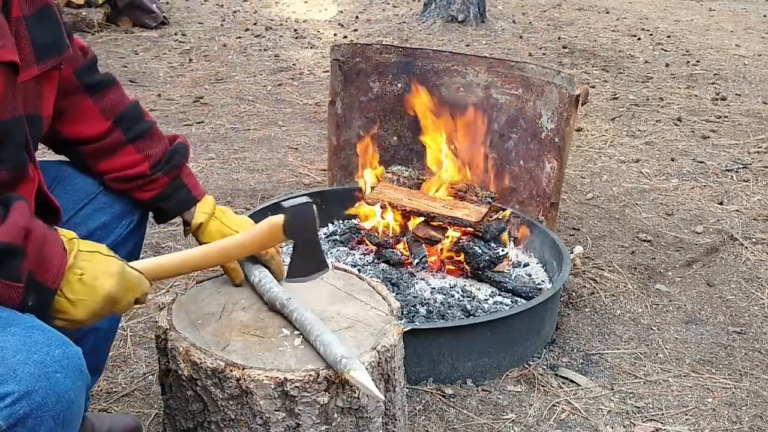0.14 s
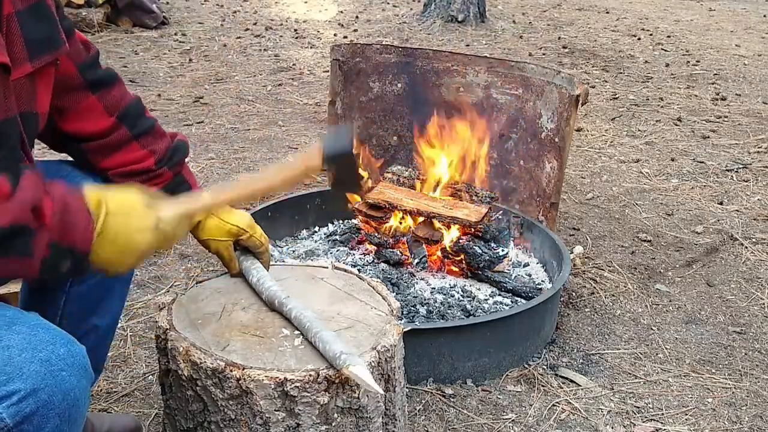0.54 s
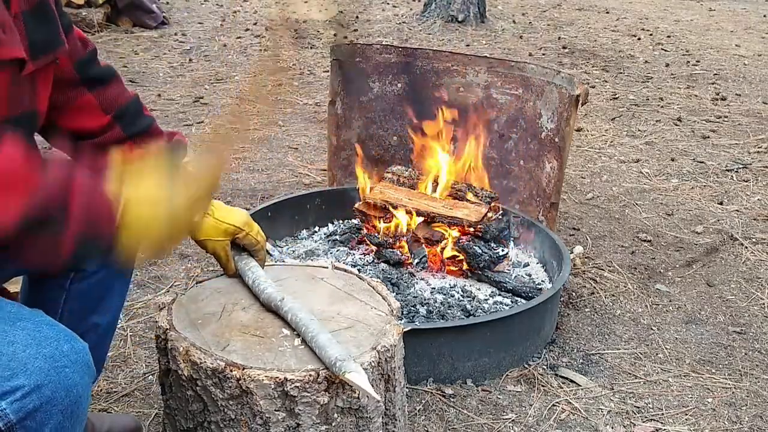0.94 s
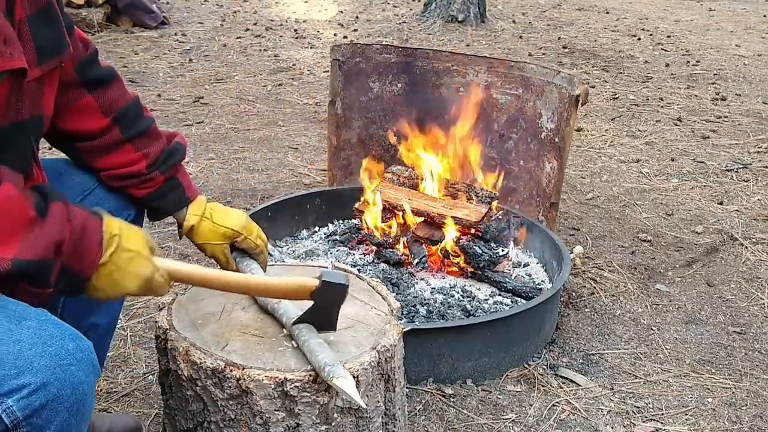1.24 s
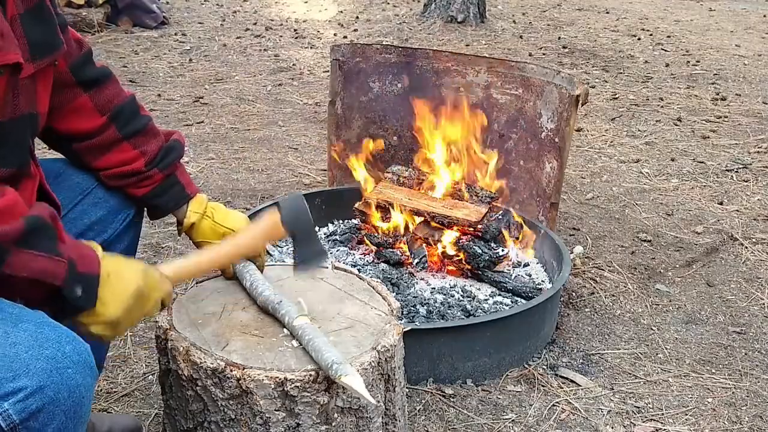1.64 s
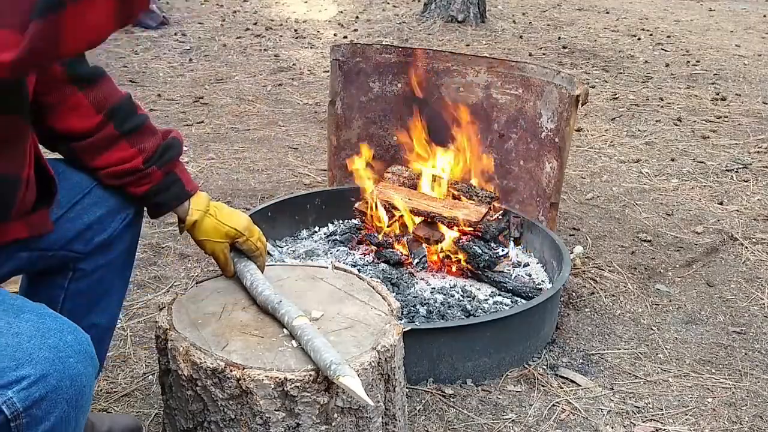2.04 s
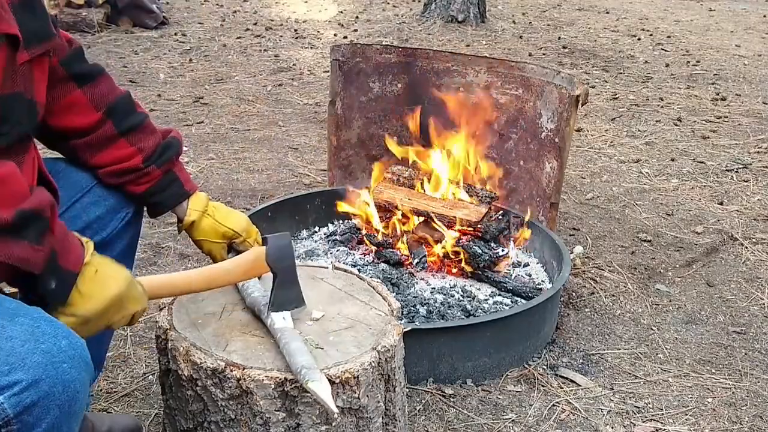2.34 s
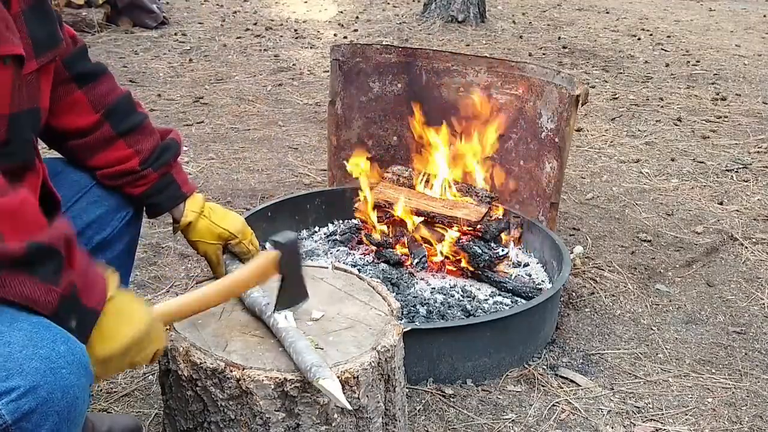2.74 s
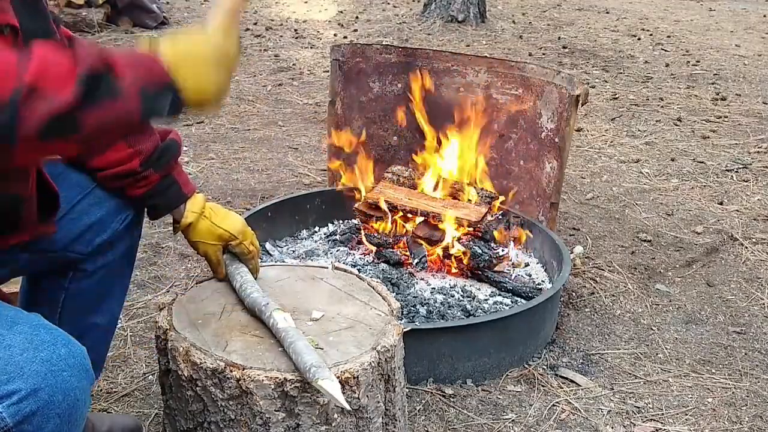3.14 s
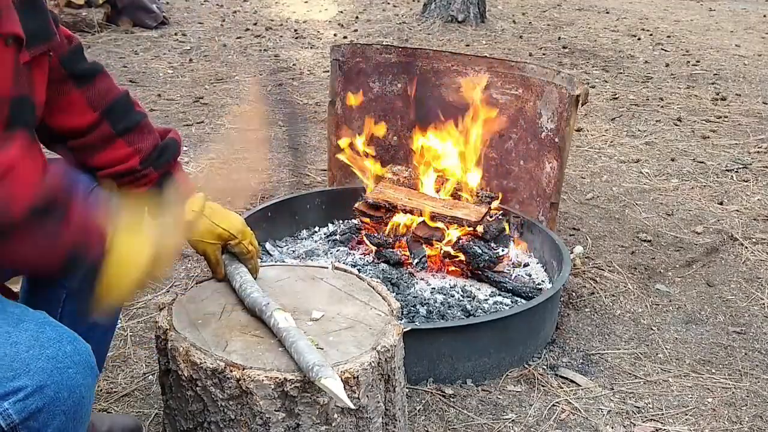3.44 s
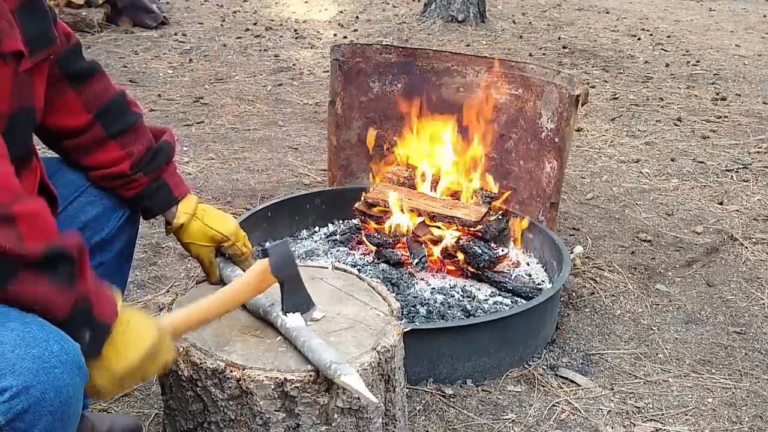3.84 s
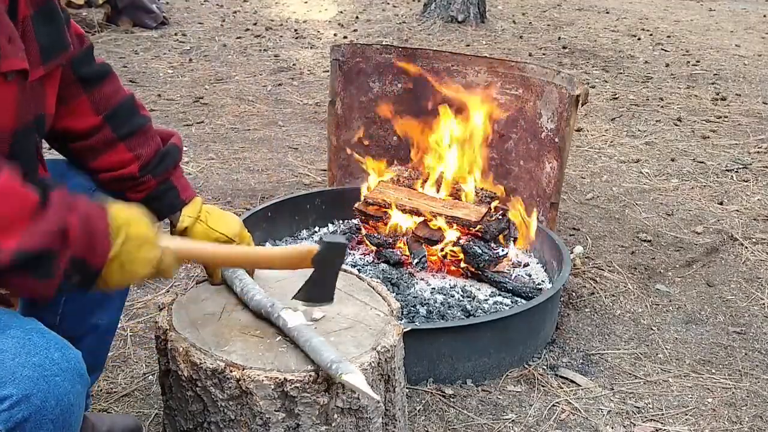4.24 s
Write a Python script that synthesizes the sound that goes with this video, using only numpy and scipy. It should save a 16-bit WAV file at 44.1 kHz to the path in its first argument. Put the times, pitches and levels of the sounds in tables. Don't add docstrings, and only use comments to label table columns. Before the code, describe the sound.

A small campfire burns in a metal ring in a pine clearing, heard close in stereo: a very quiet, low airy roar with thin sizzle, fine bright ticks and small dry pops leaning right. A stronger, sharp pop snaps at about 0.95 s. At 1.1 s a hatchet bites a green stick on a stump: a loud, bright, extremely short woody crack, with a faint dull thud through the ground and a quick diffuse echo off the trunks, swelling around 0.2 s later and soon gone. Light chips tick down until 1.4 s. A softer, duller-bodied chop lands at 2.35 s, again with chips and echo. Crackling thickens from 2.8 s, with several crisp pops between 3.0 and 3.4 s. The third chop, hard and dry, comes at 3.6 s, chips scattering until 3.8 s. Sizzle rises afterward, and a bright pop with a brief steam hiss comes at 4.3 s.

```python
import sys
import numpy as np
from scipy import signal
from scipy.fft import rfft, irfft
from scipy.io import wavfile
from scipy.ndimage import uniform_filter1d

SR = 44100
rng = np.random.default_rng(int(sys.argv[2]) if len(sys.argv) > 2 else 0)


def amplitude_ratio(level_db):
    exponent = np.asarray(level_db, float) / 20
    return 10 ** exponent


def pcm_store(signal):
    levels = np.round(np.clip(np.atleast_2d(signal), -1, 1) * 32767)
    wavfile.write(sys.argv[1], SR, levels.astype(np.int16).T)


N = 193818

# (time [s], crack [dB], echo [dB], tree line [dB], stump shudder [dB])
BLOWS = [
    (1.1063, -6.5, -28, 5, -39),
    (2.3429, -15.5, -30, 4, -36),
    (3.5901, -8.5, -31, 7.5, -35.5),
]
# (first snap [share], rise [share of bite], bark crush [dB], crush spread [ms])
ENTRIES = [
    (0.079, 0.49, -33, 1.6),
    (.25, 0.44, -34, 1.7),
    (0.12, 0.38, -23.5, 2.6),
]
# (frequency [Hz], density [dB per Hz])
CRACK_COLOURS = [
    [(2240, -32), (3800, -5), (4890, -13.5), (5500, -1), (6810, -10.5), (8360, 1.5), (10900, -15.5),
     (16000, -28)],
    [(2240, -39.5), (3800, -18), (4550, -1.5), (5970, -11), (8610, 0), (10400, -13), (12000, -9.5),
     (16000, -34.5)],
    [(2240, -36), (3800, -10), (4440, -19), (5650, -1), (7020, 0.5), (10400, -10), (12700, -12.5),
     (16000, -29)],
]
# (frequency [Hz], level [dB], t60 [s], delay after touch [ms])
STICK_MODES = [
    [(400, -8.5, .013, 4.0), (700, -10, .016, 2.8), (957.51, -10, 0.015, 1.8), (1225.3, -15, .012, 1.35),
     (1580, -17, 0.015, 1.1), (1760.8, -6.5, .011, .8), (2052, -13, 0.0088, 0.94),
     (2340, -9.5, 0.011, 1.26), (2620, -12.5, 0.014, 1.46), (2882.7, -12, .006, 1.82),
     (3300, -7.5, .007, 1.9), (3600, -4.5, 0.0047, 2), (2594.3, -15.5, .0098, 11), (3570, -20, 0.0089, 11)],
    [(228, -20.5, 0.03, 3.068), (440, -20.5, .01, 6.106), (601.34, -20, .012, 2.5),
     (733.11, -16, .022, 2.3944), (936.17, -12.5, .015, 1.4), (1200, -11, 0.016, 1.993),
     (1420, -12.5, .011, 1.1972), (1640, -9.5, 0.017, 1.45), (1832.9, -15.5, 0.016, 1.17),
     (2091.2, -6.5, .012, 1.42), (2551.8, -9, .01, 1.42), (3100, -11.5, 0.014, 1.5833),
     (3400, -9, .0084, 1.45), (2900, -23, .008, 13)],
    [(379.6, -31, 0.038, 4.5), (772, -23, 0.04421, 2), (1097, -11, 0.012, 1.49),
     (1633.7, -3, 0.0053, 2.3686), (1866.8, -11.5, 0.009418, 1.5), (2053.9, -10.5, 0.0069, 2.5),
     (2450, -22.5, .009, 1.486), (2822.4, -11, .009, 1.64), (3386, -18, 0.016, -0.0254),
     (1500, -13.5, 0.0051, 6), (1000, -22, 0.01, 0.7512), (3500, -24.5, .01, 11)],
]
# (frequency [Hz], density [dB per Hz])
SHUDDER_COLOUR = [(21, -28.5), (35, -4.5), (73, -0.5), (124, -6.5), (194, 0), (262, -16), (500, -20.5),
                  (650, -29.5), (1100, -120)]
# (time [s], peak [dB],
# frequency [Hz])
KNOCKS = [(1.128, -26.5, 1500), (1.1425, -28, 700), (2.2944, -34.5, 1000), (2.365, -29, 1300),
          (2.516, -48.5, 301), (3.578, -30, 550), (3.585, -42.5, 400), (3.5858, -40.5, 1500),
          (3.5879, -40, 2393), (2.3421, -34.5, 1400), (2.3429, -11.5, 1700), (1.1064, -22, 1500),
          (3.611, -34, 1100), (3.7096, -43, 200)]
# (time [s], peak [dB], ring [Hz], left over right [dB])
CHIPS = [(1.1222, -32.5, 8500, -2), (1.2337, -30.5, 5000, -8.5), (1.2645, -43.5, 9800, -9.5),
         (1.303, -51.5, 5670, -2), (1.325, -43, 9900, -9.5), (1.3624, -46.5, 9576, -5.5),
         (1.3793, -44, 6038, -12), (2.4701, -43, 8500, -9), (2.5161, -43.5, 9574, -11.5),
         (2.606, -48, 9100, -6), (2.5297, -60, 8500, -7), (2.616, -50, 10300, -8.5),
         (2.6536, -58, 8550, -13.5), (3.607, -23, 7909, 4), (3.717, -31.5, 6135, -12),
         (3.7496, -49, 7805, -2), (3.7799, -41.5, 9031, -9), (3.8048, -44, 9250, -16.5)]
# (frequency [Hz], level [dB])
NEAR_LEFT = [(200, 1.5), (800, 1.5), (2400, -5), (4500, -4), (6500, -4.5), (8500, -11), (11000, -7),
             (15000, -2)]
# (frequency [Hz], lead [rad])
LEFT_LEAD = [(100, 0.), (2000, .1), (3300, .7), (4300, 2.), (7000, 2.3), (9000, 3.3), (11500, 4.6),
             (14000, 6.3), (16500, 8.)]

# (frequency [Hz], density [dB per Hz])
ECHO_COLOURS = [
    [(150, -37.5), (250, -11.5), (698, -3), (1120, -14.5), (1700, -4), (2670, -12), (8400, -22),
     (16000, -35)],
    [(150, -36.5), (250, -4), (775, -0.5), (1100, -1.5), (1260, -6.5), (1400, -3), (3840, -11.5),
     (16000, -31.5)],
    [(150, -22), (250, -1.5), (607, -11.5), (938, -2.5), (2760, -12.5), (4570, -19.5), (6470, -18),
     (16000, -35.5)],
]
# (frequency [Hz], width [Hz], level [dB])
ECHO_BANDS = [
    [(2320.5, 270, 1.5), (2900, 250, -2.5), (3667.6, 300, 4), (4469, 190, -3.5), (5640, 400, 4),
     (6987, 1200, -5.5), (8500, 400, 3)],
    [(1100, 400, -2.5), (5198.6, 250, -4), (6297, 630, -5), (8800, 400, -1.5), (12644, 1600, 2.5)],
    [(1200, 300, -3.5), (4087, 470, -4.5), (5381.5, 760, -1.5), (7000, 600, 0.5), (9100, 560, 4.5)],
]
# (frequency [Hz], t60 [s])
WOOD_T60 = [(100, 0.18), (400, 0.26344), (1000, 0.25647), (2500, 0.28091), (6000, 0.26216), (9000, 0.3),
            (12000, 0.17), (16000, .24)]
# (frequency [Hz], level [dB])
FIRE_ECHO_COLOUR = [(800, -28), (2000, -8.5), (4000, -7), (8000, -8), (11000, -10.5), (15000, -19)]

# (time [s], peak [dB], ring [Hz], low part [dB], left over right [dB])
POPS = [(.2853, -42, 8800, -10, -13), (.3127, -40.5, 9364, -34.5, -8.5), (.3646, -47, 9365, -7.5, -10),
        (.4055, -48.5, 5430, -9, -9.5), (.4833, -41.5, 8279, -36, -9), (.7387, -50, 4512, -8.5, -9),
        (.9451, -23.5, 7128, -13.5, -19), (.9462, -37, 7449, -12.5, -1.5), (1.0632, -51, 9000, -1, -10),
        (1.7041, -47, 9547, -12.5, -17), (1.7221, -43.5, 5102, -25.5, -13),
        (1.9595, -46.5, 8854, -10.5, -13.5), (2.0384, -49.5, 8530, -6.5, -9), (2.0598, -34, 9131, -15, -4),
        (2.3152, -44, 8660, -13, -9.5), (2.7865, -43.5, 8471, -35.5, -8.5),
        (3.0335, -39.5, 8700, -23.5, -9.5), (3.0559, -36.5, 4400, -16.5, -14.5),
        (3.1722, -33.5, 9450, -38.5, -12.5), (3.3168, -33.5, 8552, -11.5, -7.5),
        (3.4011, -34, 9400, -32.5, -6.5), (4.0061, -47.5, 7809, -26.5, -9.5),
        (4.2855, -38.5, 9450, -15, -7.5), (4.2898, -21, 8547, -12, -16)]
# (time [s], peak [dB])
TICKS = [(.0533, -53.5), (0.202, -49), (.4254, -46.5), (.4604, -49.5), (0.5365, -54), (0.656, -54),
         (0.6945, -48.5), (0.7666, -55), (.832, -56), (.876, -58), (1.496, -53.5), (1.6877, -51),
         (1.8012, -52.5), (1.8495, -50), (2.1828, -48.5), (2.2165, -53), (2.2938, -51), (2.8544, -55),
         (2.9133, -54), (3.0505, -49), (3.2674, -53.5), (3.4176, -41), (3.4889, -51), (3.9218, -56),
         (3.9584, -54), (3.9986, -47), (4.0695, -49), (4.1356, -58), (4.1568, -59.5), (4.1995, -51),
         (4.3259, -51)]
FAINT_TICKS = [.52, .589, .702, .748, .906, .914, 1.022, 1.045, 2.228, 2.38, 2.42, 2.5936, 2.666, 2.693,
               2.705, 2.74, 3.161, 3.36, 4.086, 4.177, 4.234, 4.369, 4.385]
# (time [s], level [dB], frequency [Hz], t60 [ms])
RINGS_AND_TICKS = [(0.2744, -49, 11000, 1.227), (.2867, -52, 8500, 2.97), (0.3156, -48.5, 8500, 5.195),
                   (0.945, -25.5, 7331, 2.629), (0.947, -21.5, 8112, 4.154), (1.317, -57.5, 9000, 2.5),
                   (2.3173, -47.5, 9104, 8.), (3.0572, -34.5, 10310, 2.7), (3.318, -38, 8500, 8.5),
                   (3.3197, -39.5, 5750, 6.065), (4.2908, -30, 7434, 3.062), (2.4205, -41.5, 10500, 1.049),
                   (2.4455, -51, 9500, 1.194), (2.531, -53.5, 8500, 1.19), (2.562, -57.5, 8000, 1.0263),
                   (2.571, -59, 9500, 1.), (2.5815, -59.5, 9500, 0.9807), (2.596, -56.5, 9500, 1.009),
                   (2.459, -54, 10500, 1.001), (2.408, -45.5, 10000, 1.01), (1.3055, -55.5, 8500, 1.)]
# (centre [s], spread [ms], level [dB], frequency [Hz], width [Hz])
JETS = [(0.963, 3.0, -51.5, 7770, 5110), (1.461, 11.54, -72.5, 3400, 494),
        (1.535, 14.347, -72.5, 3300, 601.6), (1.62, 111, -66, 7490, 6506), (2.455, 9.38, -60.5, 3500, 404),
        (3.7, 8.302, -55, 3300, 700), (4.208, 9.0, -65.5, 3120, 800), (4.24, 32.77, -72, 3546, 350),
        (4.3, 3.9, -40.5, 8300, 1770), (4.304, 5.6, -52, 3100, 887.6), (1.064, 1.4, -52, 6000, 14000),
        (1.061, .9, -59, 11000, 8000), (1.0682, 1.2, -62, 9000, 4995), (2.294, 1.2, -63, 10000, 7000)]
# (centre [s], level over calm [dB], spread [s])
FLARES = [
    (0., 12, 0.0417),
    (.72, -7.5, 0.162),
    (1.02, 3, .1),
    (1.42, -1.5, 0.31),
    (2.88, 5.5, 0.22),
    (3.701, 10, 0.3558),
    (4.2, 8, 0.1183),
]
# (delay [ms], spread [ms], level [dB])
RING_WALLS = [
    (1.6, .45, -22),
    (4, 2, -42),
    (12, 5, -43),
]
# (frequency [Hz], level [dB])
POP_COLOUR = [(1000, -43), (2500, -12), (4500, -10), (6500, -5), (8500, 4.5), (11000, -1.5), (14000, -8.5),
              (16500, -21)]

# (frequency [Hz], density [dB per Hz])
ROAR_COLOUR = [(15, -43.5), (25, -17.5), (74, -0.5), (159, 0), (280, -9.5), (726, -6.5), (1180, -12.5),
               (1280, -13), (1600, -16.5), (4240, -27), (6920, -27), (8830, -25), (12600, -36),
               (15200, -33.5), (16500, -46.5)]
# (frequency [Hz], correlation [1])
DIFFUSE_SAME = [(60, 0.79), (180, 0.91), (550, 0.46), (1650, -0.23), (4970, -0.11), (15000, 0.023)]
# (frequency [Hz], left over right [dB])
DIFFUSE_LEFT = [(60, 0), (180, -1.0), (550, -1), (1650, -2), (4970, -1.5), (15000, -7.5)]
# (frequency [Hz], level [dB])
MIC = [(20, -30), (34, -12), (48, 0), (15700, 0), (16100, -8), (16700, -22), (16900, -90)]

BITE_MS, CRACK_SAME = 2.6009, 0.58
SHUDDER_RISE_S, SHUDDER_T60_S = 0.041, 0.36
GROUND_S, GROUND_SPREAD_S, GROUND_DB = 0.0041, 0.0044, 3.5
NEAR_TRUNKS_DB = -3
TREE_LINE_S, TREE_LINE_RISE_S, TREE_LINE_FALL_S = 0.18493, 0.049, 0.18
ECHO_RISE_CYCLES, ECHO_APART = 7.3, 0.82
STREAK_DB, CLUMP_DB, CLUMP_DB_PER_KHZ = 0.1769, 1.6966, 0.0785
TICK_HZ, TICK_SPREAD_HZ, TICK_LOW_DB, TICK_LEFT_DB, TICK_WANDER_DB = 8800, 890, -19, -10.5, 3
FAINT_DB, CHIP_LOW_DB, PUFF_DB = -57.5, -18, -17
EMBER_BED_MS, EMBER_BED_SHARE = .45, .4
SIZZLE_DB, ROAR_DB, ROAR_FOLLOWS = -67, -64, 0.2


def chop(crack_db, bite_ms, entry, colour, modes):
    first, rise, crush_db, crush_ms = entry
    ms = np.arange(4096) * 1000 / SR - 4
    u = np.maximum(ms, 0) / bite_ms
    snaps = rng.standard_normal(len(ms)) * amplitude_ratio(3.5 * np.minimum(rng.exponential(1, len(ms)), 4))
    unrelated = snaps[::-1]
    snaps = np.array([CRACK_SAME * snaps + np.sqrt(1 - CRACK_SAME ** 2) * unrelated, snaps])
    onset = np.minimum(first * (u > 0) + u / rise, 1)
    burst = onset * (np.exp(-u ** 3.0) + 0.068 * np.exp(-ms / 5.6))
    crush = amplitude_ratio(crush_db) * np.exp(-((ms + 0.4) / crush_ms) ** 2)
    out = amplitude_ratio(crack_db) * evened(coloured(snaps, colour)) * (burst + crush)
    for hz, db, t60, delay_ms in modes:
        add(out, (4 + delay_ms) / 1000, amplitude_ratio(db) * ring(hz, t60, .4 / hz, count=3000))
    return out


def shudder(db, rise_s, t60):
    t = np.arange(SR // 2) / SR
    a, b = (evened(coloured(rng.standard_normal(len(t)), SHUDDER_COLOUR)) for _ in range(2))
    envelope = amplitude_ratio(db - 60 * t / t60) * np.minimum(t / rise_s, 1) ** 0.49
    return envelope * np.array([0.73 * a - 0.3 * b, a + 0.21 * b])


def knock(db, hz):
    return amplitude_ratio(db) * ring(hz, 0.0065, 1.1 / hz, count=1500)


def trunks(line_db):
    t = np.arange(0, .5, .001)
    ground = amplitude_ratio(GROUND_DB) * np.exp(-((t - GROUND_S) / GROUND_SPREAD_S) ** 2)
    late = (t - TREE_LINE_S) / np.where(t < TREE_LINE_S, TREE_LINE_RISE_S, TREE_LINE_FALL_S)
    near = amplitude_ratio(NEAR_TRUNKS_DB) * np.exp(-np.maximum(late, 0) ** 2)
    line = amplitude_ratio(line_db) * np.exp(-late ** 2)
    gain = np.minimum(t / GROUND_S, 1) ** 2 * (ground + near + line)
    return np.transpose([t, 20 * np.log10(gain + 1e-3)])


def woods(colour, strength, bands=()):
    taps = rng.standard_normal((2, SR // 2)) * amplitude_ratio(3.2 * np.minimum(rng.exponential(1, SR // 2), 4))
    hz, t, z = signal.stft(taps, SR, nperseg=256)
    build_up = 1 - np.exp(-(np.outer(hz, t) / ECHO_RISE_CYCLES) ** 2)
    decay_db = read(colour, hz)[:, None] - 60 * t / read(WOOD_T60, hz)[:, None]
    z = pair(*z, hz, ECHO_APART) * build_up * amplitude_ratio(decay_db)
    chance = rng.standard_normal(z.shape[1:])
    streaks = uniform_filter1d(uniform_filter1d(chance[::-1], 2, 0), 18, 1)
    clumps = uniform_filter1d(uniform_filter1d(chance, 5, 0), 3, 1)
    relief = 0 * hz
    for band_hz, width_hz, db in bands:
        relief = relief + db * np.exp(-((hz - band_hz) / width_hz) ** 2)
    lumpy = CLUMP_DB + CLUMP_DB_PER_KHZ * hz / 1000
    texture_db = relief[:, None] + lumpy[:, None] * evened(clumps) + STREAK_DB * evened(streaks)
    tail = signal.istft(z * amplitude_ratio(texture_db), SR, nperseg=256)[1]
    tail = tail / np.sqrt(np.mean(tail[:, 400:1600] ** 2))
    return tail * amplitude_ratio(np.interp(np.arange(tail.shape[1]) / SR, *np.transpose(strength)))


def fire():
    right, left, sent = np.zeros((3, N))
    rows = crackle()
    for (s, db, hz, low_db, pan_db), noise in zip(rows, rng.standard_normal((len(rows), 1400))):
        sound = amplitude_ratio(db + 5.0) * pop(hz, low_db, PUFF_DB, noise)
        add(right, s - .0008, sound)
        add(left, s - .0008, sound * amplitude_ratio(np.clip(pan_db + 7.5, -8, 8)))
        add(sent, s, amplitude_ratio([db]))
    for s, db, hz, t60_ms in RINGS_AND_TICKS:
        sound = amplitude_ratio(db + 5) * ring(hz, t60_ms / 1000, 0.00006, count=500)
        add(right, s, sound)
        add(left, s, sound * amplitude_ratio(-1.5))
    for s, spread_ms, db, hz, width_hz in JETS:
        sound = jet(spread_ms, db, hz, width_hz)
        start = s - .003 * spread_ms
        add(right, start, sound)
        add(left, start, sound * 1.3)
    swell_db = SIZZLE_DB + flare_db()
    spits = amplitude_ratio(12 + 4.1 * np.minimum(rng.exponential(1, N), 3)) * (rng.random(N) < 190 / SR)
    spits = spits * rng.choice([-1., 1.], N)
    sizzle = coloured(spits + amplitude_ratio(-18.5) * rng.standard_normal(N), POP_COLOUR)
    return np.array([left, right]) + amplitude_ratio(swell_db) * sizzle, sent


def crackle():
    small = TICKS + [(s, FAINT_DB) for s in FAINT_TICKS]
    chance = np.clip(rng.standard_normal((len(small), 2)), -2, 2)
    ticks = []
    for (s, db), (a, b) in zip(small, chance):
        hz = TICK_HZ + TICK_SPREAD_HZ * a
        ticks.append((s, db, hz, TICK_LOW_DB, TICK_LEFT_DB + TICK_WANDER_DB * b))
    chips = [(s, db, hz, CHIP_LOW_DB, pan_db) for s, db, hz, pan_db in CHIPS]
    return POPS + chips + ticks


def pop(hz, low_db, puff_db, noise):
    ms = np.arange(len(noise)) * 1000 / SR - 2
    shape = (ms > 0) * (.6 * amplitude_ratio(-30 * abs(ms)) + amplitude_ratio(min(puff_db, -12) - 10 - 5.5 * ms))
    for delay_ms, spread_ms, db in RING_WALLS:
        shape = shape + amplitude_ratio(db) * np.exp(-((ms - delay_ms) / spread_ms) ** 2)
    click = 4 * (np.abs(ms) < 500 / SR)
    colour = [(f * (hz / 8700) ** .6, db) for f, db in POP_COLOUR]
    out = causal(noise * shape + click, colour)
    low_hz = np.clip(2300 * (hz / 8000) ** 2, 1750, 2900)
    dull = amplitude_ratio(low_db) * 2 * ring(low_hz, .003, 2e-4, count=400)
    add(out, .002, 1.1 * ring(hz, .0022, 5e-5, count=400) + dull)
    late = round(EMBER_BED_MS * np.exp(0.49 * noise[1]) * SR / 1000)
    return out + EMBER_BED_SHARE * np.roll(out, late)


def jet(spread_ms, db, hz, width_hz):
    ms = np.arange(-3 * spread_ms, 3 * spread_ms, 1000 / SR)
    f = np.fft.rfftfreq(len(ms), 1 / SR)
    resonance = 1 + ((f - hz) / width_hz * 2) ** 2
    hiss = irfft(rfft(rng.standard_normal(30000)[:len(ms)]) / resonance, len(ms))
    return amplitude_ratio(db) * evened(hiss) * np.exp(-(ms / spread_ms) ** 2)


def flare_db():
    t = np.arange(N) / SR
    return sum(db * np.exp(-((t - s) / spread) ** 2) for s, db, spread in FLARES)


def roar():
    frames, hz = N // 256 + 5, np.fft.rfftfreq(1024, 1 / SR)
    a, b, c, d, patches = rng.standard_normal((frames, 513, 5)).T
    patches = evened(uniform_filter1d(uniform_filter1d(patches, 10, 0), 10, 1))
    flicker = evened(uniform_filter1d(rng.standard_normal(frames), 5))
    flicker = flicker * np.clip(hz / 6000, 0, 1)[:, None]
    level_db = read(ROAR_COLOUR, hz)[:, None] + 1.1 * patches + 2.6 * flicker
    z = pair(a + 1j * b, c + 1j * d, hz) * amplitude_ratio(level_db)
    x = signal.istft(z, nperseg=1024, noverlap=768)[1][:, :N]
    return evened(x) * amplitude_ratio(1.5 + ROAR_DB + ROAR_FOLLOWS * flare_db())


def pair(a, b, hz, apart=0.92):
    same = np.clip(1 - apart * (1 - read(DIFFUSE_SAME, hz)), -1, 1)[:, None]
    lean = amplitude_ratio(read(DIFFUSE_LEFT, hz) / 2)[:, None]
    return np.array([a * lean, (same * a + np.sqrt(1 - same ** 2) * b) / lean])


def ring(hz, t60, rise_s, count):
    t = np.arange(count) / SR
    return (1 - np.exp(-t / rise_s)) * amplitude_ratio(-60 * t / t60) * np.sin(2 * np.pi * hz * t)


def coloured(x, points, turn=((1, 0), (2, 0))):
    hz = np.fft.rfftfreq(x.shape[-1], 1 / SR)
    response = amplitude_ratio(read(points, hz)) * np.exp(1j * read(turn, hz))
    return irfft(rfft(x) * response, x.shape[-1])


def causal(x, points):
    log_gain = np.log(amplitude_ratio(read(points, abs(np.fft.fftfreq(x.shape[-1], 1 / SR)))))
    return np.fft.ifft(np.fft.fft(x) * np.exp(np.conj(signal.hilbert(log_gain)))).real


def read(points, hz):
    f, value = np.transpose(points)
    return np.interp(np.log(hz + 1), np.log(f + 1), value)


def evened(x):
    return x / np.sqrt(np.mean(x ** 2) + 1e-20)


def add(mix, s, sound):
    part = mix[..., round(s * SR):][..., :sound.shape[-1]]
    part += sound[..., :part.shape[-1]]


def scene():
    hatchet, far = np.zeros((2, N)), roar()
    blows = zip(BLOWS, ENTRIES, CRACK_COLOURS, STICK_MODES, ECHO_COLOURS, ECHO_BANDS)
    for (s, crack_db, echo_db, line_db, low_db), entry, colour, modes, echo, bands in blows:
        add(hatchet, s - .004, chop(crack_db, BITE_MS, entry, colour, modes))
        add(far, s, amplitude_ratio(echo_db) * woods(echo, trunks(line_db), bands))
        add(far, s, shudder(low_db, SHUDDER_RISE_S, SHUDDER_T60_S))
    for s, db, hz in KNOCKS:
        add(hatchet, s, knock(db, hz))
    flames, sent = fire()
    left, right = flames + hatchet
    fire_echo = signal.fftconvolve(sent[None], woods(FIRE_ECHO_COLOUR, trunks(4)), axes=1)[:, :N]
    far += amplitude_ratio(-38) * fire_echo
    return np.array([coloured(left, NEAR_LEFT, LEFT_LEAD), right]) + far


def roll_off(x):
    return signal.sosfilt(signal.butter(12, 16840, fs=SR, output="sos"), x)


def record(dry):
    limited = np.tanh(dry / .92) * 1.01
    mix = causal(limited, MIC)
    return roll_off(mix)


dry = scene()
out = record(dry)
pcm_store(out)
```